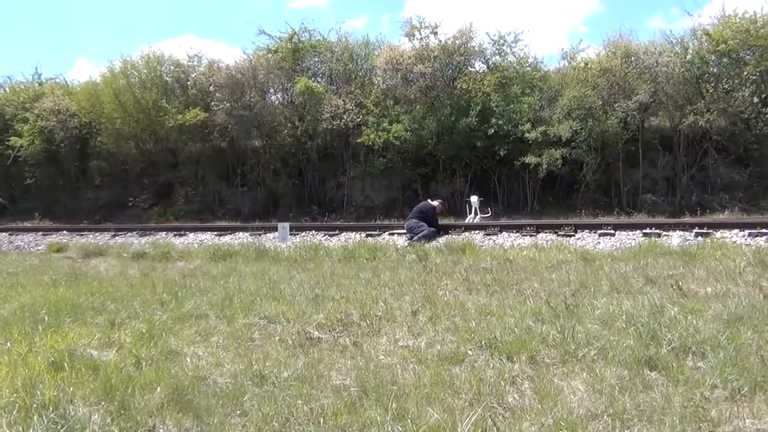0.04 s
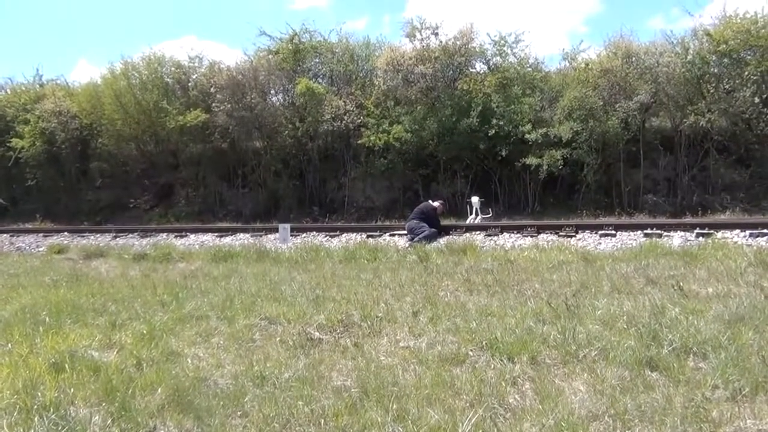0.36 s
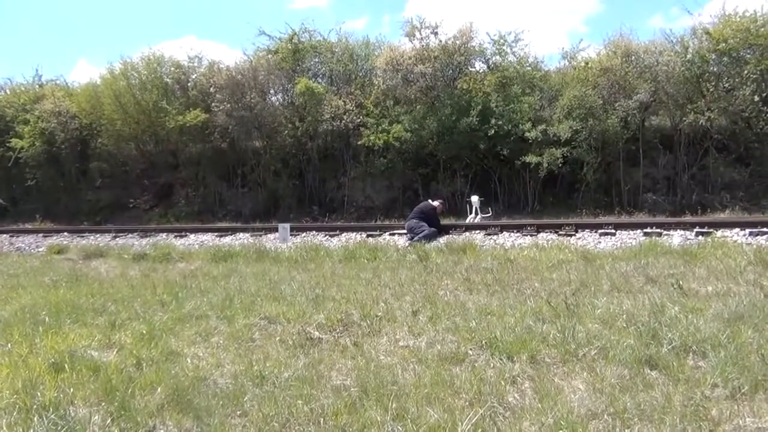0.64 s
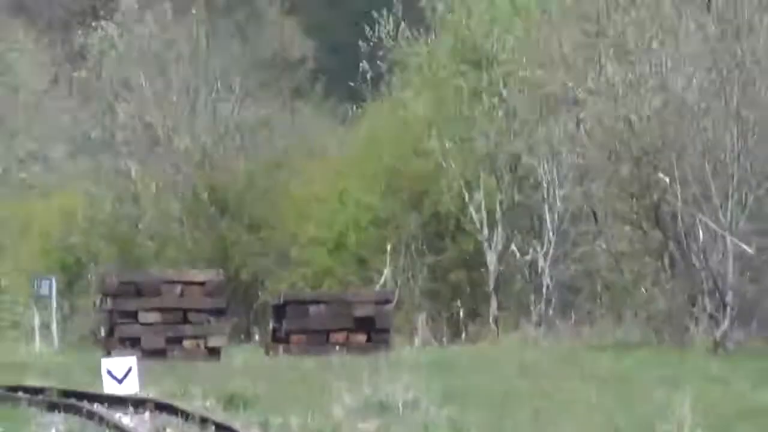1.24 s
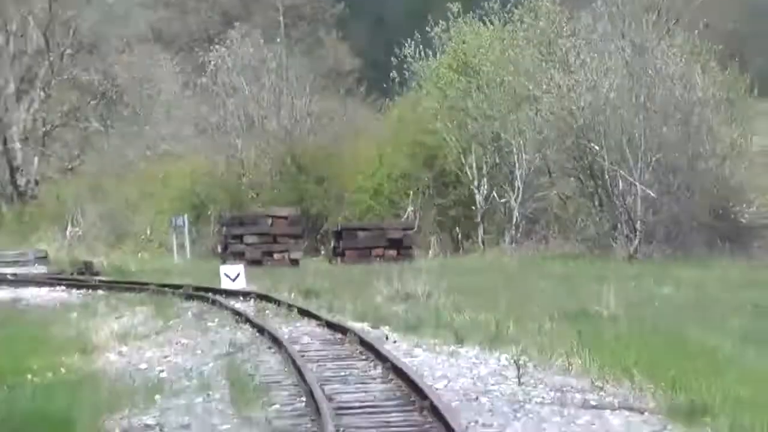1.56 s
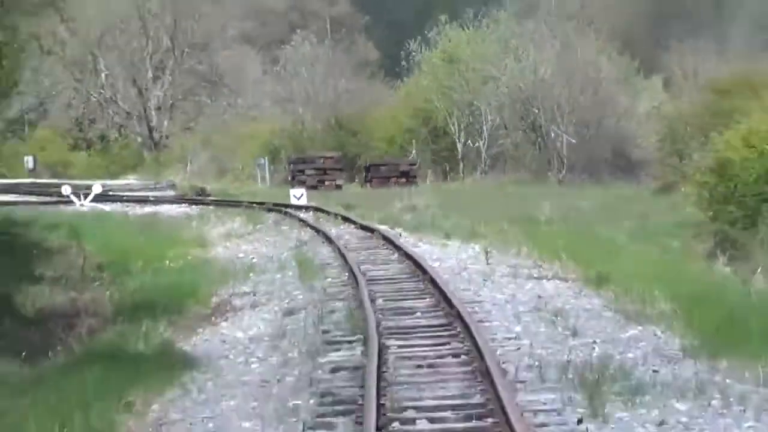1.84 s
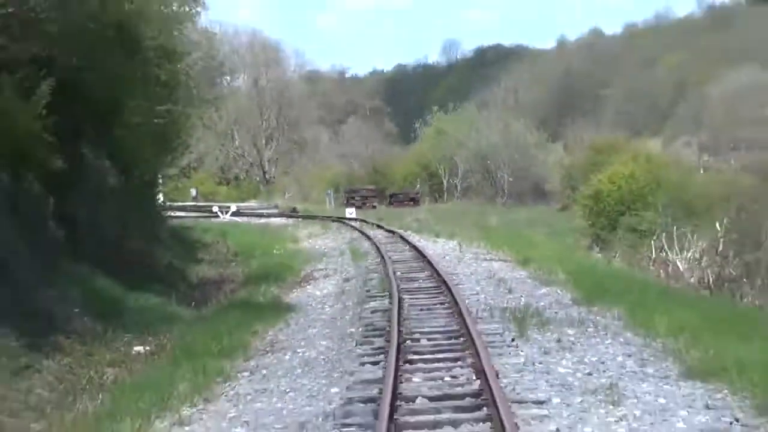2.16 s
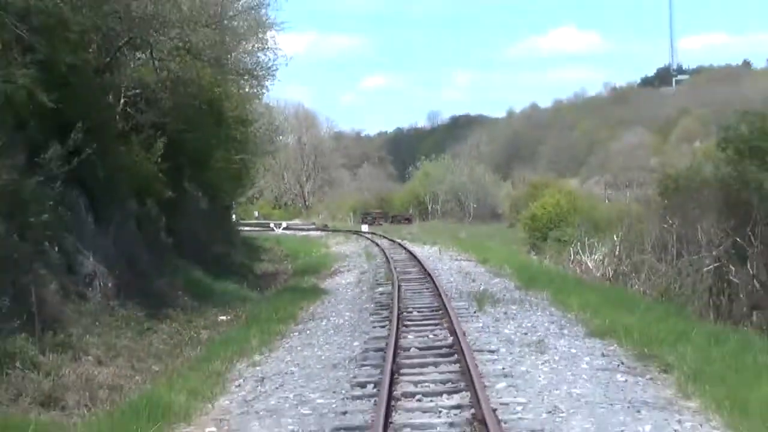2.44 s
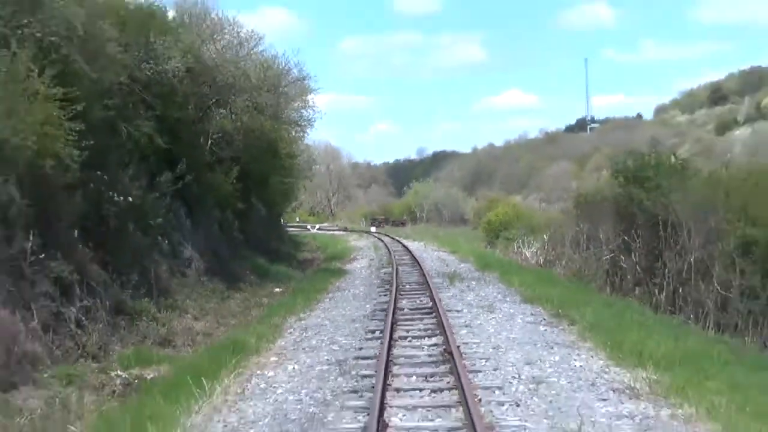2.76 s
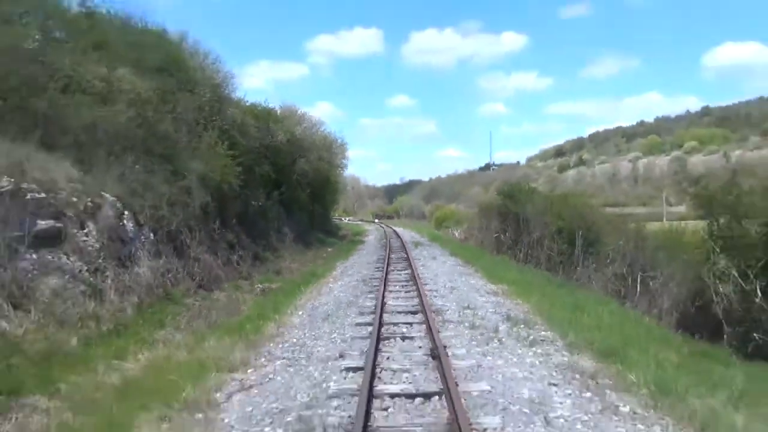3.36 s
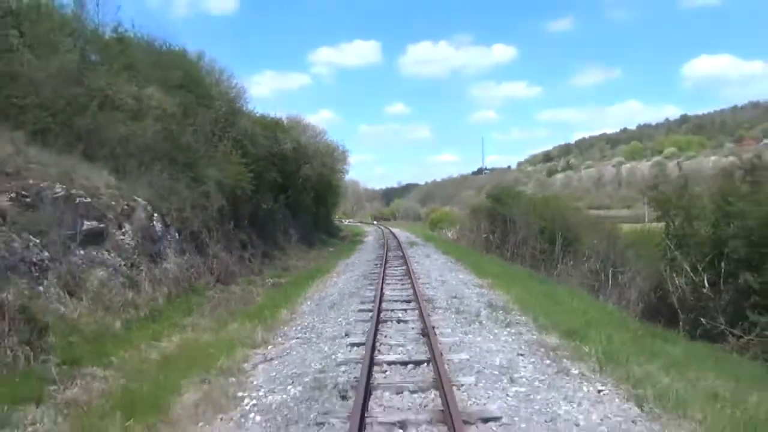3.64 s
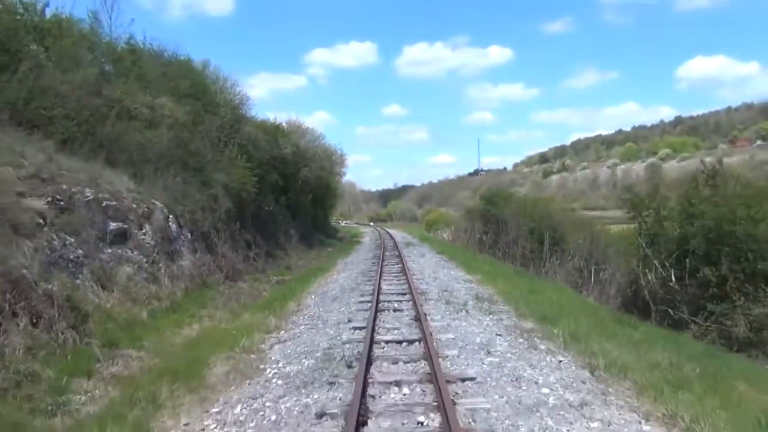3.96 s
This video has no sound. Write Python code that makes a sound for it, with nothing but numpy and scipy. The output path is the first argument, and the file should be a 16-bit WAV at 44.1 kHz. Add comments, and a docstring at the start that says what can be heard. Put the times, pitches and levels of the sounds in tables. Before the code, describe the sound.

A small rail car rumbles and rattles along narrow track after a moment of faint birdsong.

```python
"""A quiet field with faint birds; then, abruptly, a ride on a small rail car over narrow track.
Rough rails shake the car's resonant body, steel wheels roar on grit and metal grinds in the curve.
Loose fittings clatter and jingle. Jolts boom in the floor, blows knock on the frame and the car
thuds onto its springs. Near the end the wheel flanges stick and slip in two short squeaks."""
import sys
import numpy as np
from scipy import signal
from scipy.fft import rfft, irfft
from scipy.io import wavfile
from scipy.ndimage import uniform_filter1d

SR = 44100
rng = np.random.default_rng(int(sys.argv[2]) if len(sys.argv) > 2 else 0)


def store_wav(level_fs):
    """Save 16-bit WAV to argv[1]."""
    pcm = np.round(np.clip(np.atleast_2d(level_fs), -1, 1) * 32767)
    wavfile.write(sys.argv[1], SR, pcm.T.astype(np.int16))


N = 176400
T = np.arange(N) / SR
RIDE_START_S = 0.756
JOLT_ATTACK_S, JOLT_DECAY_S, CLATTER_ATTACK_S = 0.00075, 0.03, 0.0045

# Open-air rush: freq_hz, density_db
AIR_SPECTRUM = [(25, -41), (45, -38), (70, -18), (100, -13.5), (160, -9.5), (280, -7.5), (420, -4.5),
                (800, -0.5), (1050, -2.5), (1300, -8), (1600, -11), (2000, -18.5), (2450, -17.5),
                (2850, -23.5), (3300, -23.5), (4000, -23), (5600, -29), (9500, -30.5), (15000, -33)]
# Its stereo width: freq_hz, side_db
AIR_WIDTH = [(60, -15), (210, -27), (490, -17), (1130, -5), (5000, -10)]
# Falling bird chips: start_s, length_s, from_hz, level_db
BIRD_CHIPS = [(.072, .028, 5000, -69), (0.097, .028, 5050, -64), (.128, 0.029, 4980, -62),
              (0.164, .03, 4900, -67), (.238, .018, 4700, -73), (.258, .03, 5000, -67),
              (0.28, 0.037, 5050, -65), (0.317, .023, 5000, -62), (.35, .019, 4780, -63),
              (.381, .019, 4800, -64), (.458, .024, 4800, -68), (.482, .026, 5020, -68),
              (.511, .03, 4980, -65), (0.538, .035, 5000, -67), (.583, .028, 4750, -66.5)]
# Bird slurs and whistles: start_s, length_s, from_hz, to_hz, level_db
BIRD_SLURS = [(.203, .04, 3740, 3720, -70), (.26, .1, 3450, 3100, -71), (.374, .034, 3720, 3620, -68),
              (0.426, .03, 4110, 3020, -66.5), (.533, .052, 3580, 3660, -70),
              (0.592, .025, 4280, 2900, -66), (.702, .03, 3280, 2730, -69), (0.561, .075, 2560, 2400, -70),
              (.676, .026, 5020, 4800, -70), (.706, .024, 5080, 4850, -71), (.734, .022, 5080, 4880, -67)]

# Car body rumble: freq_hz, density_db
BODY_SPECTRUM = [(20, -27), (60, -19), (95, -8.5), (160, -1), (220, -3), (330, 0), (440, 3), (570, 1),
                 (700, -10), (920, -17), (1500, -21.5), (4000, -77.5)]
# Body resonances: freq_hz, width_hz, gain_db
BODY_RESONANCES = [(259.7, 18.6, 6.5), (279.3, 21.6, -2), (432, 24, -11.5), (164, 23, -12)]
# Rumble contour: time_s, level_db
RUMBLE_LEVELS = [(0.78, -24), (0.98, -23), (1.12, -27), (1.24, -25), (1.33, -22.5), (1.52, -22),
                 (1.7, -23.5), (1.97, -25), (2.2, -22), (2.45, -23.5), (2.72, -22.5), (3.02, -24),
                 (3.25, -25.5), (3.3, -19.5), (3.39, -24), (3.48, -23), (3.65, -22), (3.83, -22),
                 (3.91, -25), (3.99, -17.5)]
# Wheel roar: freq_hz, density_db
WHEEL_SPECTRUM = [(300, -12.5), (600, 8.5), (800, 4), (920, 2), (1180, 2), (1370, -2.5), (1830, -3.5),
                  (2350, -9), (2780, -9.5), (3200, -16.5), (5000, -23.5), (7000, -33), (9000, -70.5),
                  (14000, -67)]
# Wheel resonances: freq_hz, width_hz, gain_db
WHEEL_RESONANCES = [(819.4, 12, 2), (1215, 12, -9.5), (1480, 17, 1), (1647, 28, 2.5), (1832, 24, -4),
                    (2098, 42, -3.5), (2820, 32, -4.5)]
# Roar contour: time_s, level_db
ROAR_LEVELS = [(0.78, -35), (1.0, -31), (1.24, -35), (1.38, -28.5), (1.6, -26), (1.72, -31.5),
               (1.97, -35.5), (2.22, -27.5), (2.32, -31.5), (2.6, -30), (2.72, -25.5), (2.8, -30),
               (2.92, -28.5), (3.1, -31), (3.45, -32.5), (3.58, -27), (3.7, -31.5), (3.8, -29.5),
               (3.99, -30.5)]
# Heavy fittings: freq_hz, density_db
FITTING_SPECTRUM = [(500, -37), (1500, 7), (2000, 6), (2800, 6.5), (3600, 2), (5000, -2.5), (7000, -12),
                    (8500, -31.5), (11000, -47), (15000, -57.5)]
# Their resonances: freq_hz, width_hz, gain_db
FITTING_RESONANCES = [(1934, 100, -2), (2760, 23, 0), (3514, 31, -1.6), (3770, 46, -0.59), (4790, 27, 0.55),
                      (6270, 28, 0.96), (6650, 68, 1.2)]
# Grinding contour: time_s, level_db
GRIND_LEVELS = [(0.78, -50), (1.0, -49.5), (1.24, -46), (1.4, -34.5), (1.45, -38), (1.51, -32.5),
                (1.6, -39), (1.68, -42), (1.92, -48.5), (2.08, -42.5), (2.2, -39), (2.33, -43), (2.6, -45),
                (2.7, -34.5), (2.82, -45), (3.1, -43), (3.3, -47.5), (3.48, -48), (3.57, -39.5),
                (3.7, -43.5), (3.99, -40)]
# Stereo width aboard: freq_hz, side_db
CAR_WIDTH = [(40, -11), (120, -24), (260, -27), (490, -22.5), (740, -11), (1700, -11), (2600, -7),
             (5000, -9.5), (9000, -7.5), (13000, -13)]

# Loose fittings rattling: start_s, clatter_db, decay_s, jingle_db, jingle_hz
FITTING_CLATTERS = [(.946, -36, 0.019, -66, 8000), (1.018, -45, 0.048, -56.5, 9570),
                    (1.14, -30, 0.019, -53.5, 10500), (1.202, -41, .0083, -49.5, 9960),
                    (1.346, -29, 0.026, -51, 8850), (1.534, -40, 0.0098, -40.5, 12970),
                    (1.575, -26.5, .015, -68, 8000), (1.775, -35, 0.015, -68, 8000),
                    (1.961, -38, .024, -53, 10000), (2.113, -29.5, 0.021, -57.5, 9000),
                    (2.47, -25, 0.0038, -44, 11350), (2.527, -33, 0.0087, -49.5, 9800),
                    (2.648, -28, 0.017, -49.5, 10500), (2.771, -22.5, 0.014, -43.5, 11800),
                    (2.852, -32, 0.04, -49, 7900), (2.895, -33, .011, -37.5, 10570),
                    (3.026, -33.5, 0.016, -50, 11300), (3.089, -40, .0075, -43, 10700),
                    (3.373, -41, 0.012, -53, 9200), (3.46, -39, 0.013, -54.5, 8800),
                    (3.626, -33.5, 0.016, -47.5, 10370), (3.744, -24.5, 0.018, -50, 10500),
                    (3.884, -24.5, 0.016, -39, 8200)]
# Light metal piece: pitch_ratio, density_db
JINGLE_SPECTRUM = [(.29, -38), (.57, 8), (.71, 5.5), (.86, 3), (1.03, -1.5), (1.15, -22.5), (1.45, -32.5)]
# Its resonances: pitch_ratio, width_hz, gain_db
JINGLE_RESONANCES = [(.58, 89.5, 3), (.73, 110, 1), (.89, 120, 1), (1, 140, 10)]
# Jolts of the frame: start_s, thump_db, crunch_db, boom_hz
FRAME_JOLTS = [(1.272, -15.5, -31, 266.5), (1.308, -19, -42, 257.4), (1.365, -17.5, -21.5, 276),
               (1.475, -12.5, -28, 264), (1.778, -18, -28, 243.6), (2.085, -18, -35, 273),
               (2.676, -12.5, -31, 260.7), (2.74, -17.5, -43, 269), (2.855, -14, -20.5, 255.7),
               (2.924, -15, -43, 280.7), (3.095, -16, -45, 263.7), (3.19, -15.5, -42, 262.8),
               (3.272, -11.5, -44, 256), (3.315, -13, -29, 260.7), (3.355, -28, -36, 255),
               (3.609, -16, -39, 276), (3.728, -15.5, -31, 276), (3.89, -10.5, -20, 264.5),
               (3.967, -17, -35, 273)]
# Floor modes: pitch_ratio, t60_s, gain_db
FLOOR_MODES = [(1, 0.27, -1.5), (1.68, 0.17, -6.5), (1.91, .08, -0.5)]
# Hard blows on the frame: start_s, level_db
FRAME_KNOCKS = [(2.472, -10.5), (2.511, -21), (1.2749, -17.5), (2.27, -22.5), (2.857, -15.5), (3.315, -20),
                (3.608, -23), (3.728, -21), (3.889, -18)]
# Frame modes: freq_hz, t60_s, gain_db
FRAME_MODES = [(560, 0.071, -3.5), (955, 0.008, 0.5), (1265, 0.014, 0), (1890, 0.019, -10),
               (5070, 0.007, -9.5)]
# Drops onto the springs: start_s, level_db
SPRING_DROPS = [(1.425, -40), (2.675, -43), (3.205, -31.5), (3.605, -36), (3.875, -39.5)]
# Their deep thud: freq_hz, density_db
THUD_SPECTRUM = [(15, 1), (35, -10.5), (70, 4), (110, -2.5), (250, -34), (1000, -76)]
# Flange squeaks: start_s, length_s, pitch_hz, level_db
FLANGE_SQUEAKS = [(3.888, 0.068, 5060, -38.5), (3.152, 0.053, 1520, -31)]


def undb(db):
    """Decibels to gain."""
    return 10 ** (np.asarray(db) / 20)


def unit_rms(x):
    """Scale to rms 1."""
    return x / np.sqrt(np.mean(x ** 2))


def contour(points):
    """Gain over time from (time_s, level_db) points."""
    return undb(np.interp(T, *np.array(points).T))


def colour(x, points):
    """Filter by (freq_hz, gain_db) points on a log frequency axis."""
    hz, db = np.array(points).T
    bins_hz = np.maximum(np.arange(N // 2 + 1) * SR / N, 1)
    return irfft(rfft(x) * undb(np.interp(np.log(bins_hz), np.log(hz), db)), N)


def resonate(x, hz, width_hz):
    """One resonance, gain 1 at its centre."""
    return signal.lfilter(*signal.iirpeak(hz, hz / width_hz, fs=SR), x)


def add_resonances(x, modes):
    """A shaken part adds its resonances: freq_hz, width_hz, gain_db."""
    return x + sum(undb(db) * resonate(x, hz, width_hz) for hz, width_hz, db in modes)


def wander(rate_hz):
    """Smooth random drift, rms 1."""
    hold = int(SR / rate_hz)
    steps = np.repeat(rng.standard_normal(N // hold + 1), hold)
    return unit_rms(uniform_filter1d(uniform_filter1d(steps, hold), hold)[:N])


def impacts(per_s, spread_db):
    """Dense tiny impacts of uneven size, rms 1."""
    size = undb(spread_db * np.minimum(rng.exponential(size=N), 5))
    hits = rng.random(N) < per_s / SR
    return unit_rms(hits * size * np.sign(rng.standard_normal(N)))


def stereo(mid, side, width):
    """Left and right from a centre signal and an unrelated side signal."""
    return mid + colour(side, width) * np.array([[1], [-1]])


def burst(start_s, attack_s=JOLT_ATTACK_S, decay_s=JOLT_DECAY_S):
    """Quick rise, exponential fall."""
    age_s = np.maximum(T - start_s, 0)
    return (1 - np.exp(-age_s / attack_s)) * np.exp(-np.minimum(age_s / decay_s, 40))


def strike(start_s, modes):
    """Struck modes dying away: freq_hz, t60_s, gain_db."""
    age_s = np.clip(T - start_s, 0, 1)
    return sum(undb(db - 60 * age_s / t60_s) * np.sin(2 * np.pi * hz * age_s) for hz, t60_s, db in modes)


def field_air(level_db=-55.5, drift_db=0.4):
    """Soft distant rush of open country."""
    mid, side = (unit_rms(colour(rng.standard_normal(N), AIR_SPECTRUM)) for _ in range(2))
    return undb(level_db + drift_db * wander(rate_hz=7.1)) * stereo(mid, side, AIR_WIDTH)


def chirp(start_s, length_s, from_hz, to_hz, bend):
    """One bird note; bend over 1 glides late, under 1 early."""
    progress = np.clip((T - start_s) / length_s, 0, 1)
    pitch_hz = from_hz + (to_hz - from_hz) * progress ** bend
    return np.sin(np.pi * progress) * np.sin(2 * np.pi * np.cumsum(pitch_hz) / SR)


def birds(chip_end_hz=4290, flutter_db=2, echo_db=-2, echo_t60_s=0.5):
    """Falling chips and scattered slurs, echoed by trees."""
    chips = sum(undb(db) * chirp(*chip, chip_end_hz, bend=2.23) for *chip, db in BIRD_CHIPS)
    slurs = sum(undb(db) * chirp(*slur, bend=0.464) for *slur, db in BIRD_SLURS)
    song = (chips + slurs) * undb(flutter_db * wander(rate_hz=200.7))
    tails = rng.standard_normal((2, N)) * undb(-60 * T / echo_t60_s)
    echo = np.array([signal.fftconvolve(song, tail / np.linalg.norm(tail))[:N] for tail in tails])
    return song + undb(echo_db) * echo


def body_rumble(rumble_gain_db=-1.5, jolt_gain_db=-6.5):
    """Rail bumps and jolts shake the car's body."""
    rumble = undb(rumble_gain_db) * contour(RUMBLE_LEVELS)
    jolts = sum(undb(db + jolt_gain_db) * burst(start_s) for start_s, db, _, _ in FRAME_JOLTS)
    bumps = unit_rms(colour(impacts(per_s=1500, spread_db=2), BODY_SPECTRUM))
    return add_resonances(bumps * np.hypot(rumble, jolts), BODY_RESONANCES)


def wheel_roar(roar_gain_db=-0.61, crunch_gain_db=-0.4, flutter_db=1.2):
    """Steel rolls over gritty rail and crunches at each jolt."""
    roar = undb(roar_gain_db + flutter_db * wander(rate_hz=35.46)) * contour(ROAR_LEVELS)
    crunch = sum(undb(db + crunch_gain_db) * burst(start_s) for start_s, _, db, _ in FRAME_JOLTS)
    grit = unit_rms(colour(impacts(per_s=2600, spread_db=2), WHEEL_SPECTRUM))
    return add_resonances(grit * np.hypot(roar, crunch), WHEEL_RESONANCES)


def heavy_fittings(grind_gain_db=-1.5, clatter_gain_db=1.5, flutter_db=2):
    """Metal grinds on and breaks into short flurries of tiny collisions."""
    grind = undb(grind_gain_db + flutter_db * wander(rate_hz=60)) * contour(GRIND_LEVELS)
    clatter = sum(undb(db + clatter_gain_db) * burst(start_s, CLATTER_ATTACK_S, decay_s)
                  for start_s, db, decay_s, _, _ in FITTING_CLATTERS)
    collisions = unit_rms(colour(impacts(per_s=7000, spread_db=1.5), FITTING_SPECTRUM))
    return add_resonances(collisions * np.hypot(grind, clatter), FITTING_RESONANCES)


def jingles(gain_db=3.5):
    """In each clatter a light piece rings at its own pitch."""
    touches = impacts(per_s=6000, spread_db=2.5)
    out = 0
    for start_s, _, decay_s, level_db, pitch_hz in FITTING_CLATTERS:
        spectrum = [(ratio * pitch_hz, db) for ratio, db in JINGLE_SPECTRUM]
        modes = [(ratio * pitch_hz, width_hz, db) for ratio, width_hz, db in JINGLE_RESONANCES]
        flurry = unit_rms(colour(touches, spectrum)) * burst(start_s, CLATTER_ATTACK_S, decay_s)
        out += undb(level_db + gain_db) * add_resonances(flurry, modes)
    return out


def floor_booms(swell_s=0.0087):
    """Each jolt rings the floor, at a slightly different pitch."""
    out = 0
    for start_s, level_db, _, pitch_hz in FRAME_JOLTS:
        modes = [(ratio * pitch_hz, t60_s, db) for ratio, t60_s, db in FLOOR_MODES]
        swell = np.clip((T - start_s) / swell_s, 0, 1)
        out += undb(level_db) * swell * strike(start_s, modes)
    return out


def frame_knocks(contact_s=0.00031, cutoff_hz=4500):
    """Dry blows on the frame, rounded by the contact time."""
    blows = sum(undb(db) * strike(start_s, FRAME_MODES) for start_s, db in FRAME_KNOCKS)
    pole = np.exp(-2 * np.pi / (contact_s * SR))
    rounded = signal.lfilter([1 - pole], [1, -pole], blows)
    return signal.sosfilt(signal.butter(2, cutoff_hz, fs=SR, output="sos"), rounded)


def spring_thuds():
    """The car drops onto its springs: bursts of deep noise."""
    drops = sum(undb(db) * burst(start_s, decay_s=0.047) for start_s, db in SPRING_DROPS)
    return drops * unit_rms(colour(rng.standard_normal(N), THUD_SPECTRUM))


def flange_squeaks(width_hz=350):
    """Flanges stick and slip on the rail; uneven slips excite a narrow, rough ring."""
    slips = impacts(per_s=2500, spread_db=3.5)
    out = 0
    for start_s, length_s, pitch_hz, level_db in FLANGE_SQUEAKS:
        progress = np.clip((T - start_s) / length_s, 0, 1)
        arch = 2 * np.sqrt(progress * (1 - progress))
        scrape = resonate(resonate(slips, pitch_hz, width_hz), pitch_hz, width_hz)
        out += undb(level_db) * arch * unit_rms(scrape)
    return out


def ride():
    """The rolling car: noisy layers spread in stereo, booms and knocks centred."""
    mid, side = (body_rumble() + spring_thuds() + wheel_roar() + heavy_fittings()
                 + jingles() + flange_squeaks() for _ in range(2))
    return stereo(mid + floor_booms() + frame_knocks(), side, CAR_WIDTH)


def scene(crossfade_s=0.001):
    """The field, then a hard cut to the ride."""
    aboard = np.clip((T - RIDE_START_S) / crossfade_s, 0, 1)
    return (1 - aboard) * (field_air() + birds()) + aboard * ride()


def record(dry):
    """Steep low-pass at 15.7 kHz."""
    return signal.sosfilt(signal.ellip(8, 0.2, 70, 15700, fs=SR, output="sos"), dry)


dry = scene()
out = record(dry)
store_wav(out)
```